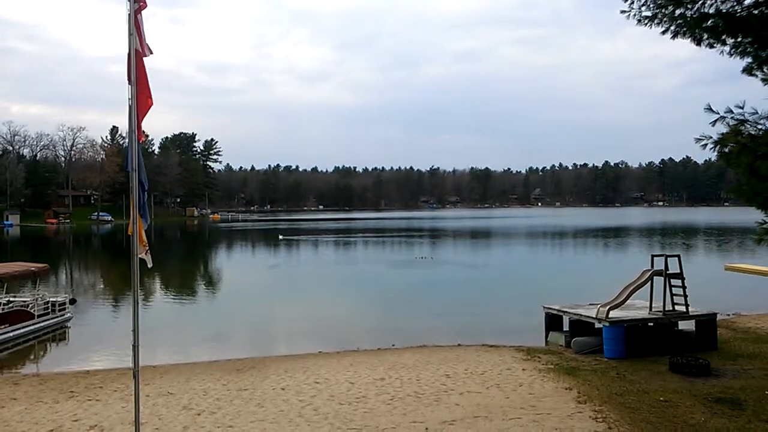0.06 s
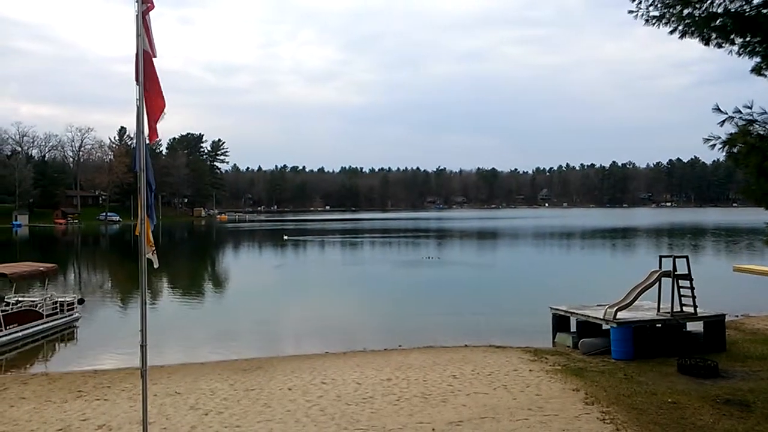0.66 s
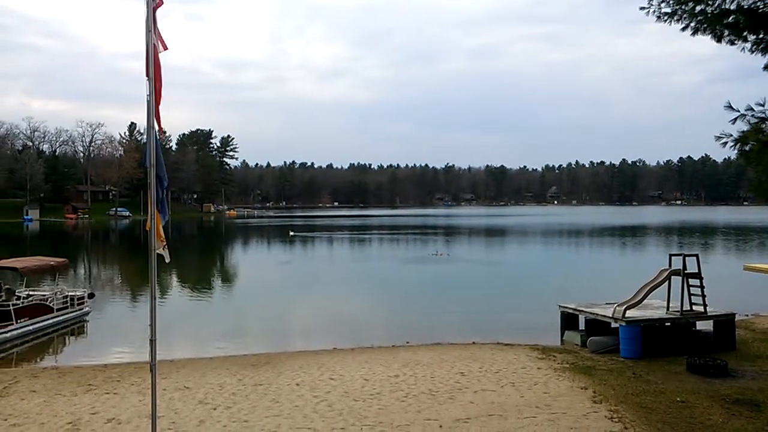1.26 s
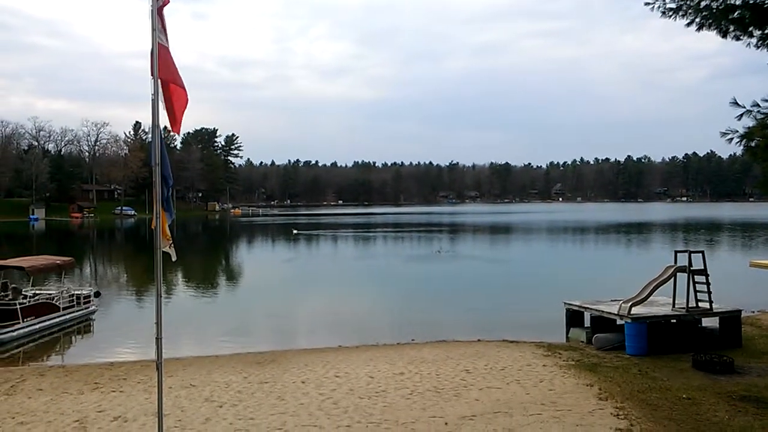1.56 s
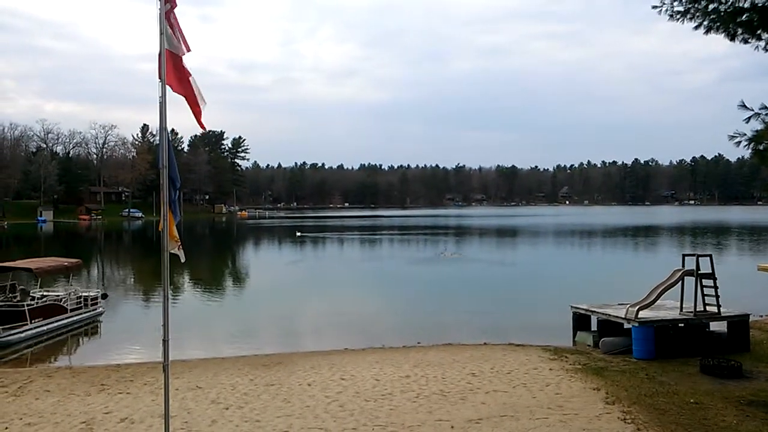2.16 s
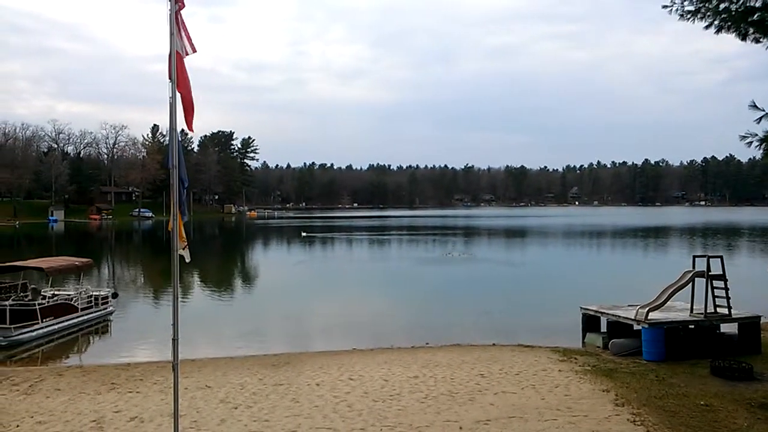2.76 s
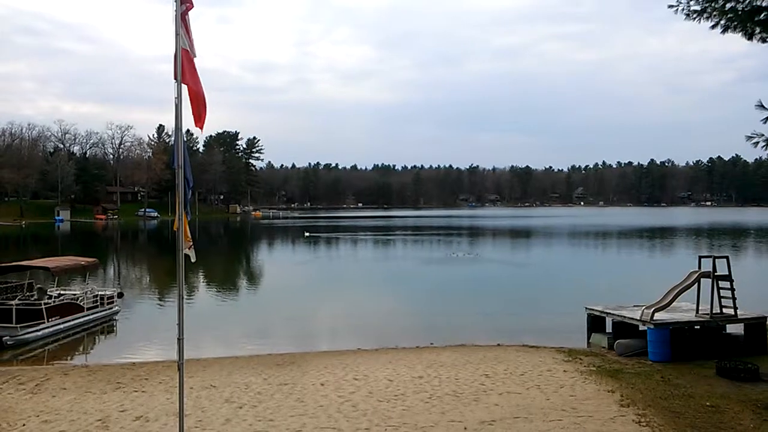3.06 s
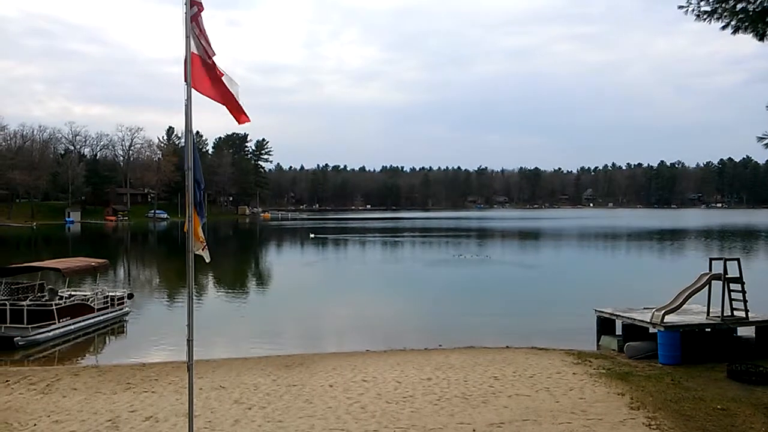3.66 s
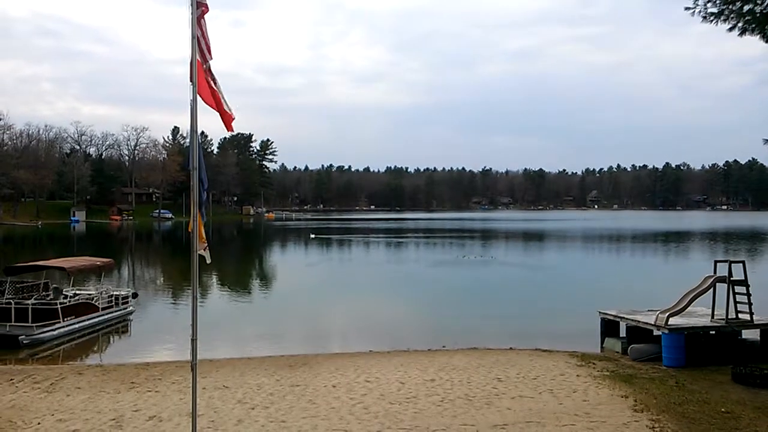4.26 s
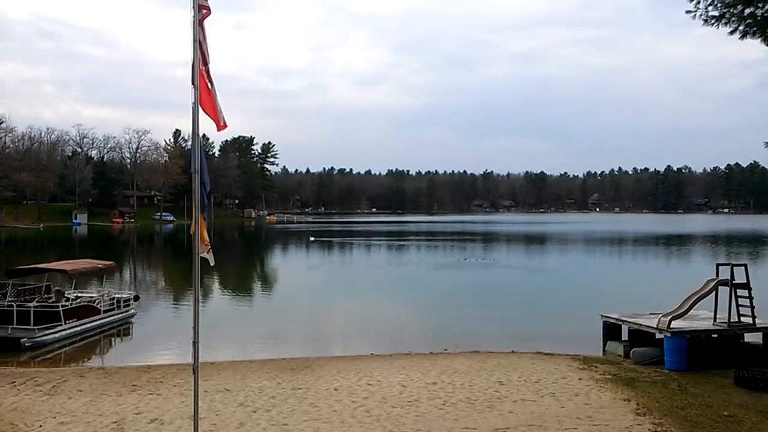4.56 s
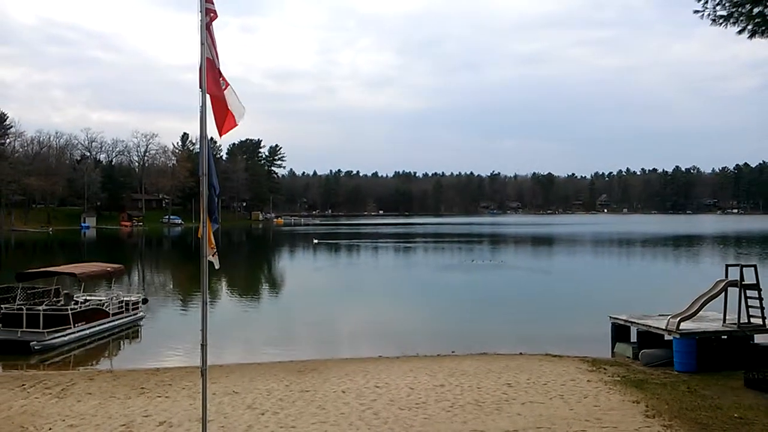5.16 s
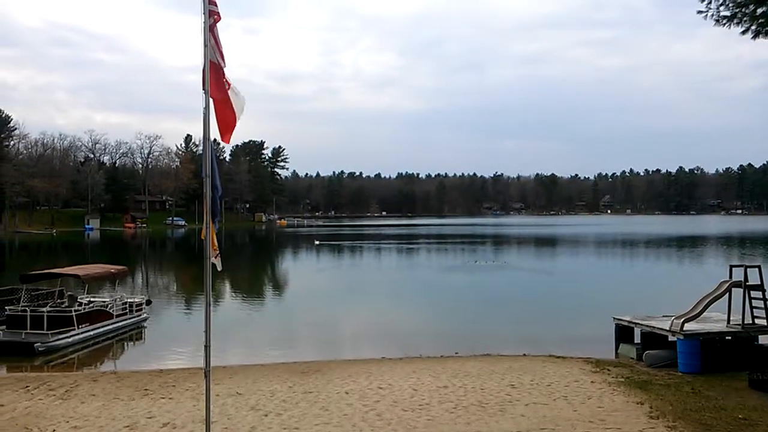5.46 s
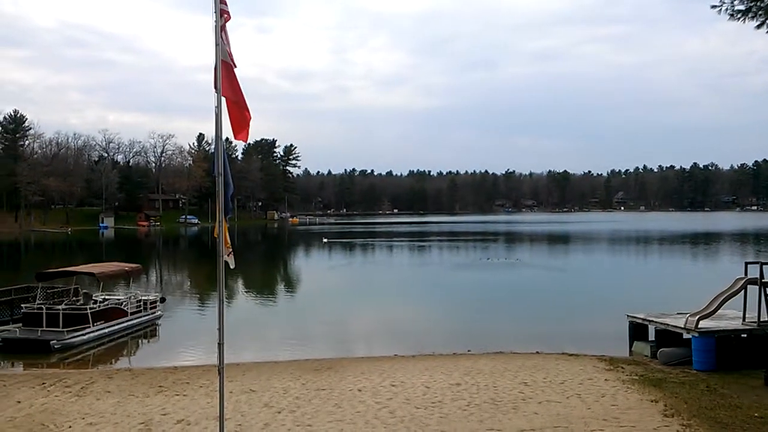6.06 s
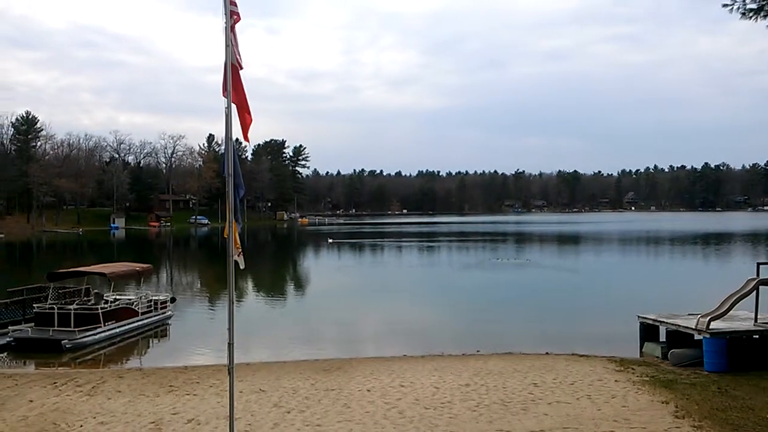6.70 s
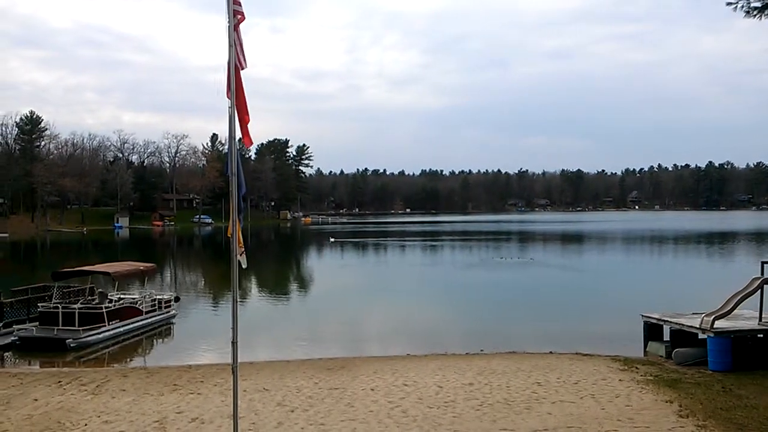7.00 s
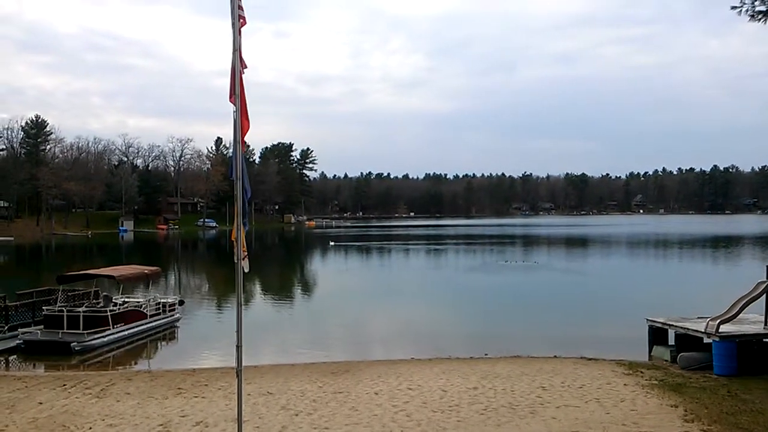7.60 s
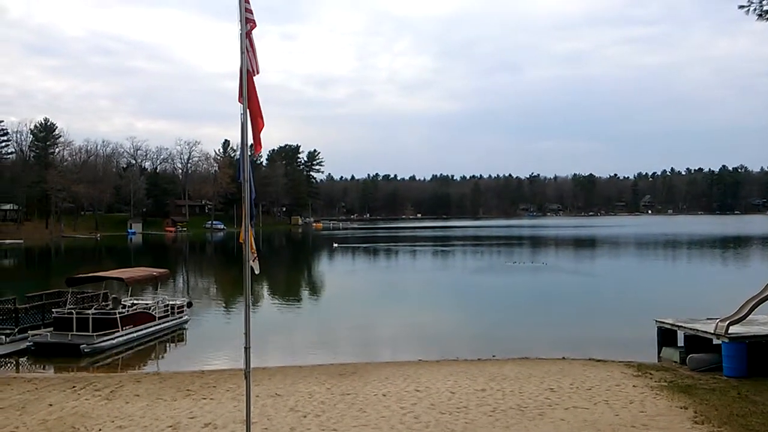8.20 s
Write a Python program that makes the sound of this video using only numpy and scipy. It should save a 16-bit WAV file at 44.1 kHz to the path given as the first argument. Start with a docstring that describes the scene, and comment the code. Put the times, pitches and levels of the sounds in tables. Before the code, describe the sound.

A waterfowl calls loudly over a calm lake in four short bouts, each a string of hoarse syllables breaking into reedy squeals that echo off the wooded shore. Between the second and third bouts, a smaller bird gives a quick run of seven sharp chips. Songbirds whistle faintly far away. Light gusts rumble and thump on the nearly mono microphone over a soft open-air hush.

```python
"""A waterfowl calls over a calm lake in four bouts of hoarse syllables, uneven pulses ringing its throat
and bill; the middle syllables break into a reedy squeal. A smaller bird answers with seven sharp chips,
harmonics swept through its beak's resonance. Songbirds whistle far off and the wooded shore echoes.
Light gusts buffet and thump the nearly mono microphone, over a faint open-air hush."""
import sys
import numpy as np
from scipy import signal
from scipy.fft import rfft, irfft, next_fast_len
from scipy.io import wavfile
from scipy.ndimage import uniform_filter1d, map_coordinates

SR = 44100
rng = np.random.default_rng(int(sys.argv[2]) if len(sys.argv) > 2 else 0)


def dump(signal):
    """Clip the signal to [-1, 1] and save it as 16-bit WAV at the path in sys.argv[1]."""
    limited = np.clip(np.atleast_2d(signal).T, -1, 1)
    pcm = np.round(limited * 32767).astype(np.int16)
    wavfile.write(sys.argv[1], SR, pcm)


N = 372204


def amp(db):
    """Decibels to gain."""
    return 10 ** (np.asarray(db) / 20)


def unit(x):
    """Scale to rms 1."""
    return x / np.sqrt(np.mean(x ** 2) + 1e-20)


def along(points, hz):
    """Read (frequency, value) points on a log frequency axis."""
    f, v = np.transpose(points)
    return np.interp(np.log(np.abs(hz) + 1), np.log(f + 1), v)


def bell(hz, centre, width):
    """An EQ bell of height 1, its width in octaves."""
    return np.exp(-.5 * (np.log2((hz + 1) / centre) / width) ** 2)


def wobble(rate, size):
    """A smooth random modulator, rate knots a second."""
    return map_coordinates(rng.standard_normal(4096), [np.arange(size) * rate / SR], mode="wrap")


def filtered(x, response):
    """Shape x with a gain given as a function of frequency."""
    size = x.shape[-1]
    padded = next_fast_len(size + 8192)
    return irfft(rfft(x, padded) * response(np.fft.rfftfreq(padded, 1 / SR)), padded)[..., :size]


def noise(spectrum):
    """Coloured noise of rms 1."""
    return unit(filtered(rng.standard_normal(N), lambda hz: amp(along(spectrum, hz))))


def add(track, start, sound):
    """Mix a sound into a track at a start time in seconds."""
    part = track[max(round(start * SR), 0):][:len(sound)]
    part += sound[:len(part)]


def progress(length):
    """A ramp from 0 to 1 over a note, one value per sample."""
    return np.linspace(0, 1, max(int(length * SR), 2))


def arch(u, power):
    """A fade in and out; a lower power gives steeper edges."""
    return np.abs(np.sin(np.pi * u)) ** power


def phase_of(hz):
    """Phase in radians of a moving frequency."""
    return 2 * np.pi * np.cumsum(hz) / SR


# Colour of the hush: (frequency [Hz], gain [dB])
HUSH_EQ = [(30, 26), (110, 7), (190, 19.5), (230, 13), (290, 11), (450, 3.5), (900, 2.5), (1500, -1.5),
           (3000, -5), (5000, -12.5), (8000, -10.5), (9600, -19), (11500, -11), (15800, -9)]
# Fader ride of the hush: (time [s], relative level [dB])
HUSH_RIDE = [(0, -59), (.38, -61), (.55, -54), (.8, -54.5), (.92, -60.5), (1.3, -55.5), (2.3, -57),
             (2.7, -57), (5, -56), (7.7, -56.5), (7.95, -63.5), (8.44, -56.5)]


def hush(trim_db=5.0):
    """A faint, dark bed of open air that dips and recovers."""
    times, levels = np.transpose(HUSH_RIDE)
    return amp(np.interp(np.arange(N) / SR, times, levels) + trim_db) * noise(HUSH_EQ)


# Colours of the wind's deep buffet and lighter flutter: (frequency [Hz], gain [dB])
BUFFET_EQ = [(12, -8), (28, 5.5), (58, -0.5), (75, -19.5), (120, -37.5), (250, -33), (600, -156)]
FLUTTER_EQ = [(45, -12), (75, 3.5), (110, -5.5), (150, -17.5), (200, -24), (300, -49), (600, -53),
              (1500, -141)]
# Gusts on the microphone: (time [s], length [s], buffet level [dB], flutter trim [dB])
GUSTS = [(0.426, 0.36, -35, 1.5), (1.53, 0.72, -50, 9), (2.398, 0.38, -33.5, 3.5), (2.882, 0.36, -29, 0),
         (3.293, 0.13, -26.5, -3), (3.487, 0.055, -30, -3.5), (3.664, 0.096, -39, -3),
         (3.911, 0.21, -36, 0), (4.209, 0.15, -28.5, 3), (4.476, 0.13, -34.5, -1), (5.346, 0.33, -40, -12),
         (5.652, 0.052, -28.5, 3), (5.816, 0.081, -32.5, -14), (5.99, 0.14, -30.5, 7),
         (6.136, 0.16, -30.5, -6.5), (6.587, 0.12, -37, -6), (6.752, 0.18, -30, -4),
         (7.014, 0.22, -31, -11), (7.426, 0.19, -25.5, -24), (7.719, 0.018, -26.5, -3),
         (8.187, 0.16, -40, 1.5)]


def wind(breeze_db=-54, calm_flutter_db=-60, attack_s=0.021, release_s=0.052, turbulence_db=1.8,
         brisk_db=-30, brisk_flutter_db=-39.5, flutter_growth=1.52):
    """Each gust rises, holds and dies away: a heavy buffet, and a flutter that grows faster with force."""
    def steady(x):
        """Even out the slow swells, so that the gusts set them."""
        return x / np.sqrt(np.abs(uniform_filter1d(x ** 2, size=SR // 12)) + 0.041)
    t = np.arange(N) / SR
    buffet, flutter = np.full(N, amp(breeze_db)), np.full(N, amp(calm_flutter_db))
    for start, length, db, trim_db in GUSTS:
        attack = np.clip((t - start) / attack_s, 0, 1)
        push = attack * np.exp(-np.maximum(t - start - length, 0) / release_s)
        force = amp(db - brisk_db) * push  # 1 in a brisk gust
        buffet = np.hypot(buffet, amp(db) * push)
        flutter = np.hypot(flutter, amp(brisk_flutter_db + trim_db) * force ** flutter_growth)
    eddies = amp(turbulence_db * wobble(22, N))
    rumble = eddies * buffet * steady(noise(BUFFET_EQ))
    return rumble + eddies ** flutter_growth * flutter * steady(noise(FLUTTER_EQ))


# Distant birds, clean whistles and hoarse falling calls:
# (time [s], length [s], start pitch [Hz], end pitch [Hz], level [dB])
FAR_WHISTLES = [(0.112, 0.081, 3350, 3950, -76), (0.233, 0.041, 3500, 4800, -73),
                (.262, 0.089, 4600, 5070, -70), (0.317, 0.1, 4900, 5800, -78),
                (0.48, 0.081, 3260, 3570, -60), (.56, 0.19, 3540, 3200, -71.5),
                (0.578, 0.15, 2590, 2900, -70), (0.628, 0.032, 5670, 7140, -62),
                (1.565, 0.045, 5700, 8200, -58), (1.871, 0.032, 6870, 7930, -57),
                (2.032, 0.026, 4340, 4460, -66), (2.127, .05, 3500, 3150, -69),
                (2.269, 0.06, 3070, 4230, -69.5), (4.553, 0.095, 2290, 2570, -66.5),
                (7.626, 0.082, 2520, 2144, -67), (7.813, 0.028, 4350, 4580, -66.5),
                (7.94, 0.16, 2330, 2540, -81), (8.118, 0.17, 2560, 2285, -76),
                (8.273, 0.039, 3850, 3320, -70), (8.345, 0.091, 2200, 2400, -73)]
FAR_CALLS = [(0.1, 0.077, 2300, 1636, -70.5), (0.352, 0.066, 2050, 1566, -69),
             (0.536, .09, 2474, 1745, -66), (7.632, 0.059, 1940, 1670, -69), (7.917, .04, 1830, 1650, -105)]


def songbirds(whistle_jitter=.003, call_jitter=.04):
    """Thin sine glides that level off towards the end; pitch jitter makes the calls hoarse."""
    out = np.zeros(N)
    for notes, jitter in (FAR_WHISTLES, whistle_jitter), (FAR_CALLS, call_jitter):
        for start, length, first_hz, last_hz, db in notes:
            u = progress(length)
            glide = last_hz + (first_hz - last_hz) * (1 - u) ** 1.3
            hz = glide * (1 + jitter * wobble(486, len(u)))
            swell = arch(u, 0.84) * amp(0.75 * wobble(104, len(u)))
            add(out, start, amp(db) * unit(swell * np.sin(phase_of(hz))))
    return out


# Colour of the waterfowl's hiss: (frequency [Hz], gain [dB])
HISS_EQ = [(350, -3), (700, -25), (1300, 11), (1650, 11.5), (2100, 5.5), (2500, 8), (3050, 10), (3600, 3),
           (4050, 6), (4600, -3), (5300, -2.5), (6600, -8), (7700, -1.5), (8700, -23), (10000, -70)]
# Plain hoarse syllables that open or close a bout:
# (time [s], length [s], level [dB], hiss send [dB], throat tone re level [dB], open bill resonance [Hz])
GRUNTS = [(1.051, .13, -39, -15, -14.5, 1170), (1.44, 0.11, -39.5, -9, -11, 1187),
          (2.495, 0.16, -32, -5, -10, 1233), (4.678, 0.13, -32, -8, -14.5, 1224),
          (5.187, .095, -35.5, -8.5, -9.5, 1180), (6.395, 0.13, -33, -13.5, -10, 1196),
          (6.902, .1, -34, -8.5, -7.5, 1120)]


def rasps(pulse_hz=170, jitter=0.0656, quicken=0.0978, ring_s=0.0016, throat_ring_s=0.0035,
          shut_hz=920, throat_hz=640, pipe_hz=900, pipe_db=-8, fundamental_db=-24,
          nose_hz=2500, twang_hz=3020, nose_db=-13.0):
    """Uneven pulses ring the throat, each with a puff of hiss; the resonance rises as the bill opens."""
    voice, hiss_level, fundamental = np.zeros((3, N))
    t = np.arange(SR // 50) / SR
    knock = t / ring_s * np.exp(-t / ring_s)

    def mode(hz, detune):
        """One resonance, slightly detuned from pulse to pulse."""
        return np.sin(2 * np.pi * hz * (1 + .022 * detune) * t)
    for start, length, db, hiss_db, throat_db, open_hz in list(GRUNTS) + honk_endings():
        u = progress(length)
        bill, pipe, throat, nose, puffs = np.zeros((5, len(u)))
        chance = rng.standard_normal((40, 5))
        onsets = (np.cumsum(1 + jitter * chance[:, 0]) - 1) / pulse_hz
        for at, (_, strength, detune_a, detune_b, detune_c) in zip(onsets, chance):
            at += quicken * length * np.sin(2 * np.pi * at / length) / (2 * np.pi)  # faster mid-note
            bill_hz = shut_hz + (open_hz - shut_hz) * arch(at / length, 1)
            pulse = amp(1.2 * strength) * knock
            add(bill, at, pulse * mode(bill_hz, detune_a))
            add(pipe, at, pulse * mode(pipe_hz, detune_b))
            add(throat, at, t * np.exp(-t / throat_ring_s) * mode(throat_hz, detune_c))
            add(nose, at, pulse * (mode(nose_hz, detune_b) + 0.31 * mode(twang_hz, detune_c)))
            add(puffs, at, pulse)
        gate, swell = arch(u, .32), arch(u, .28)
        body = swell * unit(bill) + amp(pipe_db) * unit(pipe) + amp(throat_db) * unit(throat)
        add(voice, start, amp(db) * gate * body)
        add(voice, start, amp(db + hiss_db + nose_db) * swell * unit(nose))
        add(hiss_level, start, amp(db + hiss_db - 4.5) * arch(u, .35) * unit(puffs + .2))
        hum = np.sin(phase_of(pulse_hz * (1 + jitter * wobble(54, len(u)))))
        add(fundamental, start, amp(db + fundamental_db) * gate * unit(hum))
    # below its lowest resonance the throat radiates only a faint fundamental
    voice = filtered(voice, lambda hz: 1 / (1 + (470 / (hz + 1)) ** 12))
    return voice + fundamental + hiss_level * noise(HISS_EQ)


# Resonance of the squeal: (frequency [Hz], gain [dB])
REED_EQ = [(400, -59), (600, -27), (850, 9), (1700, 4.5), (2100, -6.5), (2550, 8), (3050, 10.5),
           (3400, 11.5), (4250, 10.5), (5050, 7), (5900, 1), (6700, 0.5), (7600, 3.5), (8500, -1.5),
           (9400, -22), (12000, -61)]
# Honks, each a moan that breaks into a squeal and collapses into a rasp:
# (squeal time [s], length [s], pitch [Hz], rise [share], relative level [dB], roughness [0-1],
#  brightness [dB], sidebands [dB], lock time [s], bite frequency [Hz], bite boost [dB],
#  rasp delay [s], moan lead [s], rasp level [dB], rasp hiss send [dB])
HONKS = [(1.231, 0.064, 812, 0.0095, -36, 0.18, -24.5, -10, .012, 6400, 12.5, 0.028, 0.0023, -40.5, -8),
         (2.677, 0.094, 847, -0.0006, -25, 0.25, -6.5, -1, 0.021, 2100, 7, .046, 0.0023, -32, -2),
         (2.847, 0.069, 840.5, 0.014, -24, 0.1, -7, -9, 0.017, 4900, 4.5, 0.035, .02, -33.5, -2),
         (3.013, 0.062, 828, 0.066, -33.5, 0.2, -7.5, 5, .012, 600, 6, .025, 0.00209, -32.5, -3),
         (4.845, 0.097, 844.2, 0.00012, -26, 0.1, -4, -10, 0.02, 6140, 4.5, 0.048, .006, -35.5, -2),
         (5.003, 0.0634, 833, 0.078, -31.5, 0.63, -16.5, -5, 0.014, 2960, 9, .04, 0.01, -34.5, -5),
         (6.575, 0.081, 847.2, -0.017, -27, 0.2, -15.5, -18, 0.0096, 1800, 0.5, 0.035, 0.031, -36, -11.5),
         (6.727, 0.07, 848, 0.062, -32, 0.27, -20, -2, 0.026, 6250, 7.5, 0.034, 0.018, -33, -9.5)]


def moans(length_s=0.055, first_hz=284, last_hz=320, jitter=0.051, re_rasp_db=-6.5):
    """A short rising voiced note opens each honk, strongest in its second to fourth harmonics."""
    out, u = np.zeros(N), progress(length_s)
    glide = first_hz + (last_hz - first_hz) * u
    for start, *_, lead_s, rasp_db, _ in HONKS:
        phase = phase_of(glide * (1 + jitter * wobble(415, len(u))))
        tone = sum(amp(line_db) * np.sin(k * phase + rng.uniform(0, 2 * np.pi))
                   for k, line_db in enumerate([10.5, 5.5, 8, -5.5, -18], 2))
        add(out, start - lead_s, amp(rasp_db + re_rasp_db) * unit(tone) * arch(np.sqrt(u), 0.09))
    return out


def squeals(scoop=0.028, jitter=0.023, hiss_db=-5, upper_side_db=-6, bite_octaves=0.15, shudder_db=5):
    """The voice starts in a harsh scrape, then locks into a high reedy tone that shudders unevenly."""
    out, hiss_level = np.zeros((2, N))
    for start, length, pitch, rise, db, rough, bright_db, side_db, lock_s, bite_hz, bite_db, *_ in HONKS:
        u = progress(length)
        chaos = rough + (1 - rough) * np.exp(-(u * length / lock_s) ** 2)
        hz = pitch * (1 + rise * (u - .5) - scoop * (1 - u) ** 10 + jitter * chaos * wobble(760, len(u)))
        hz *= 1 + .003 * wobble(45, len(u))  # a slower waver
        # a swing every third cycle puts sidebands between the harmonics, stronger just below each one
        phase, tone = phase_of(hz) / 3, np.zeros(len(u))
        for k in range(2, 36):
            line_hz = k * pitch / 3
            line_db = along(REED_EQ, line_hz) + bright_db * np.clip((k - 4) / 8, 0, 1)
            line_db += [0, side_db + upper_side_db, side_db][k % 3]
            line_db += bite_db * bell(line_hz, bite_hz, bite_octaves) + 3.5 * wobble(70, len(u))
            swell = arch(u ** 0.61, .45 + .06 * k)  # high overtones sound only at full pressure
            tone += swell * amp(line_db) * np.sin(k * phase + rng.uniform(0, 2 * np.pi))
        shudder = amp(shudder_db * np.sqrt(chaos) * np.tanh(wobble(520, len(u))))
        add(out, start, amp(db - 8.5) * unit(tone * shudder))
        breath = np.sqrt(rough * chaos) / 2 * unit(shudder) * arch(u, 0.1)
        add(hiss_level, start, amp(db + hiss_db) * breath)
    return out + hiss_level * noise(HISS_EQ)


def honk_endings(length_s=.071, throat_db=-9.5, bill_hz=1160):
    """Cues for the rasp that ends each honk, in the columns of GRUNTS."""
    return [(start + delay_s, length_s, db, hiss_db, throat_db, bill_hz)
            for start, *_, delay_s, _, db, hiss_db in HONKS]


# The waterfowl's colour in each bout: (time [s], length [s], dip [Hz], dip width [octaves], dip gain [dB],
#  peak [Hz], peak width [octaves], peak gain [dB], treble sent to the shore [dB])
BOUT_EQ = [(1, .7, 3600, 0.28, -6.5, 2570, 0.13, 6, 5), (2.45, .8, 6200, 1, -4.5, 2840, 0.073, 5.5, 2.5),
           (4.6, .8, 3560, .08, -2, 7100, 0.38, 2.5, -0.5),
           (6.35, .8, 4440, 0.36, -11.5, 5870, 0.12, 14.5, 7.5)]


def towards_beach(x):
    """The bird faces a new way in each bout, which dulls one band of its sound and lifts another."""
    out = np.zeros(N)
    for start, length, dip_hz, dip_width, dip_db, peak_hz, peak_width, peak_db, _ in BOUT_EQ:
        bout = x[round(start * SR):][:int(length * SR)]
        add(out, start, filtered(bout, lambda hz: amp(dip_db * bell(hz, dip_hz, dip_width)
                                                      + peak_db * bell(hz, peak_hz, peak_width))))
    return out


def towards_shore(x, treble_hz=3500, octaves=0.74):
    """The more the bird faces away from the beach, the more treble it sends across the lake."""
    out = np.zeros(N)
    for start, length, *_, treble_db in BOUT_EQ:
        bout = x[round(start * SR):][:int(length * SR)]
        add(out, start, filtered(bout, lambda hz: amp(treble_db * bell(hz, treble_hz, octaves))))
    return out


# Single eddies hitting the microphone: (time [s], relative level [dB], pitch [Hz])
THUMPS = [(2.939, -20, 60.5), (3.042, -11.5, 51.4), (3.404, -12, 57.2), (3.433, -15.5, 58),
          (4.318, -24, 71.4), (6.022, -13.5, 38), (6.063, -10, 61), (6.104, -14, 67), (6.763, -15.5, 39.2),
          (6.883, -15.5, 47), (6.913, -14, 58), (7.154, -24, 47.7), (7.442, -20, 40), (7.52, -11, 35),
          (7.624, -14, 59), (7.738, -22.5, 94)]


def thumps(width_cycles=0.22, half_s=.06, trim_db=-1.5):
    """An eddy pushes and pulls the air at the microphone once."""
    out, t = np.zeros(N), np.arange(-half_s, half_s, 1 / SR)
    for centre, db, hz in THUMPS:
        push_pull = np.sin(2 * np.pi * hz * t) / np.cosh(hz * t / width_cycles)
        add(out, centre - half_s, amp(db + trim_db) * push_pull)
    return out


# Resonance of the small bird's beak: (frequency [Hz], gain [dB])
BEAK_EQ = [(900, -11), (1500, -16), (2150, -9.5), (2750, -10), (3350, 1), (4150, -2), (4750, -18),
           (6000, -17.5), (7000, -15.5), (8100, -15), (9200, -31), (11000, -27.5), (15000, -66)]
# Contour of every chip: (time into the chip [s], pitch re held pitch [ratio], level [dB], roughness [0-1])
CHIP_CONTOUR = [(0, .45, -15, 0.8), (.007, .6, -6.5, 0.9), (.013, 0.86, -3, 0.77),
                (0.0171, .97, -0.5, 0.17), (0.0304, 1.03, 0, 0.25), (.035, .9, 0, .6),
                (.041, .69, 0.5, 0.86), (.052, .45, -1, 1)]
# The run of chips: (time [s], held pitch [Hz], level [dB], held tone boost [dB], scrape re level [dB])
CHIPS = [(3.494, 708, -42.5, 0, -5), (3.614, 724.4, -40.5, 2.5, -4), (3.741, 694, -43, 2, -6),
         (3.898, 679, -48.5, -7, -0.5), (4.030, 688, -41.5, -1, -5.5), (4.162, 675, -39.5, 2, -4),
         (4.322, 682, -38.5, -1, -6)]


def chips(length_s=0.045, jitter=0.069, even_db=-13, scratch_db=-5, dip_db=-9, dip_hz=7000,
          scrape_hz=4150, scrape_delay_s=0.031, scrape_s=0.0207, scrape_fall=0.11):
    """The pitch climbs, holds and snaps down, sweeping mainly odd harmonics through the beak's resonance.
    The held part is nearly pure, the flanks are scratchy, and a short high scrape ends the note."""
    out, scratch = np.zeros((2, N))
    u, v = progress(length_s), progress(scrape_s)
    times, *contour = np.transpose(CHIP_CONTOUR)
    for start, pitch, db, held_db, scrape_db in CHIPS:
        pace = u + .03 * arch(u, 1) * wobble(60, len(u))  # no two chips keep the same pace
        ratio, contour_db, rough = [np.interp(pace * length_s, times, column) for column in contour]
        hz = pitch * ratio * (1 + jitter * rough * wobble(1400, len(u)))
        phase, tone = phase_of(hz), np.zeros(len(u))
        for k in range(2, 22):
            line_db = along(BEAK_EQ, k * hz) + even_db * (k % 2 == 0) + 2.5 * wobble(200, len(u))
            line_db += dip_db * (1 - rough) * bell(k * pitch, dip_hz, 0.29)  # softer top while held
            tone += amp(line_db) * np.sin(k * phase + rng.uniform(0, 2 * np.pi))
        grit_db = 4 * rough * np.tanh(wobble(600, len(u)))
        swell = arch(u, .2) * amp(contour_db + held_db * ratio ** 6 + grit_db)
        add(out, start, amp(db) * unit(tone * swell))
        add(scratch, start, amp(db + scratch_db) * rough * swell)
        slide = scrape_hz * (1 + scrape_fall * (.5 - v) + .065 * wobble(1400, len(v)))
        scrape = np.sin(phase_of(slide)) * amp(4 * wobble(500, len(v))) * arch(np.sqrt(v), 0.55)
        add(out, start + scrape_delay_s, amp(db + scrape_db) * unit(scrape))
    return out + scratch * noise(BEAK_EQ)


def reverb(x, impulse, db):
    """Convolve with an impulse response of unit energy and set the return level."""
    return amp(db) * signal.fftconvolve(x, impulse / np.linalg.norm(impulse))[:N]


def trees(x, db, t60, predelay_s=.006):
    """Nearby trunks and boats scatter short, sparse reflections."""
    t = np.arange(SR) / SR
    spikes = rng.standard_normal(SR) ** 3
    return reverb(x, spikes * amp(-60 * t / t60) * (t > predelay_s), db)


def bank(x, db, delay_s=0.072, t60=0.021):
    """The nearest wooded bank returns one soft, smeared slapback."""
    out, t = np.zeros(N), np.arange(SR // 4) / SR
    add(out, delay_s, reverb(x, rng.standard_normal(len(t)) * amp(-60 * t / t60), db))
    return out


def blurred(x, smear_s=.00005, smear_rate=230):
    """Many unsteady paths through the trees widen each partial, the high ones most."""
    return map_coordinates(x, [np.arange(N) + smear_s * SR * wobble(smear_rate, N)])


# Decay of the far shore's echo: (frequency [Hz], time to fall 60 dB [s])
SHORE_DECAY = [(200, 0.11), (900, 2.7), (3000, 2.7), (5000, 2.28), (9000, 1.4)]


def shore(x, db, hz_per_db=1300, build_s=0.012):
    """The far wooded shore gives a long, duller tail that comes in swells."""
    hz, frame_s, spectrum = signal.stft(rng.standard_normal(2 * SR), SR, nperseg=256)
    loss_db = 60 * frame_s / along(SHORE_DECAY, hz)[:, None] + hz[:, None] / hz_per_db
    tail = signal.istft(spectrum * amp(-loss_db), SR, nperseg=256)[1]
    swells = amp(2.5 * wobble(9, len(tail)))  # bays and points answer in turn
    fade_in = 1 - np.exp(-np.arange(len(tail)) / SR / build_s)
    return reverb(x, tail * swells * fade_in, db)


# Faint stereo width, mostly in the treble: (frequency [Hz], side re mid [dB])
WIDTH_EQ = [(100, -80), (350, -32.5), (1000, -67), (2500, -31.5), (5000, -29), (12000, -24)]


def scene():
    """Birds, their near and far echoes and the wind sit in the middle, over the hush."""
    hoarse, reedy, chatter, song = rasps() + moans(), squeals(), chips(), songbirds()
    waterfowl = towards_beach(hoarse + reedy)
    ripple = unit(1 + .35 * wobble(260, N))  # echoes of the thin tones come back rough
    reedy_send, chatter_send = reedy * ripple, chatter * ripple
    near = trees(towards_beach(hoarse + reedy_send), db=-9.5, t60=.22)
    near += trees(chatter_send, db=-4, t60=.6) + trees(song, db=-6, t60=0.13)
    near += bank(towards_beach(reedy_send), db=-14)
    far = shore(towards_shore(hoarse), db=-14.5, hz_per_db=1800)
    far += shore(towards_shore(blurred(reedy_send)), db=-16, hz_per_db=660)
    far += shore(chatter_send, db=-18.5) + shore(song, db=-11.5)
    mid = waterfowl + chatter + song + near + far + wind() + thumps() + hush()
    side = filtered(mid, lambda hz: 1j * amp(along(WIDTH_EQ, hz)))  # a quarter cycle out of phase
    return np.array([mid + side, mid - side])


def record(dry, cutoff_hz=15900):
    """A brick-wall low-pass takes off the very top."""
    return filtered(dry, lambda hz: hz < cutoff_hz)


dry = scene()
out = record(dry)
dump(out)
```